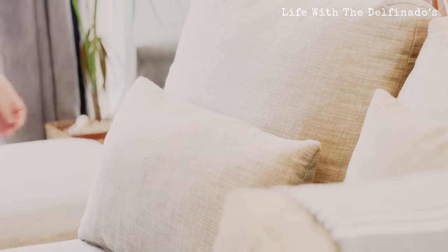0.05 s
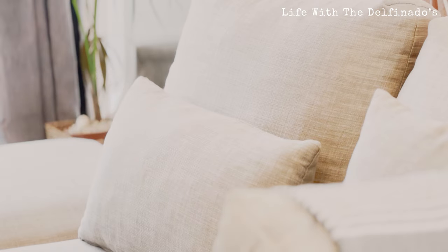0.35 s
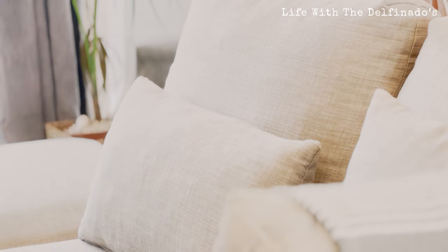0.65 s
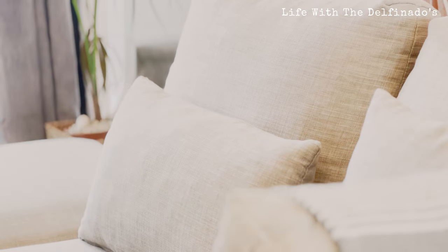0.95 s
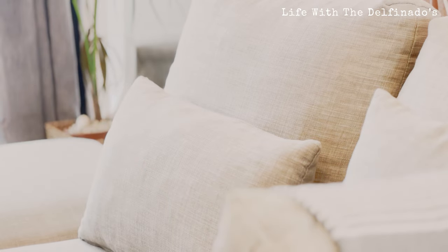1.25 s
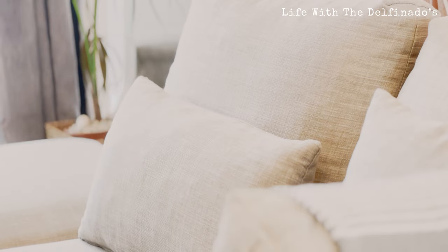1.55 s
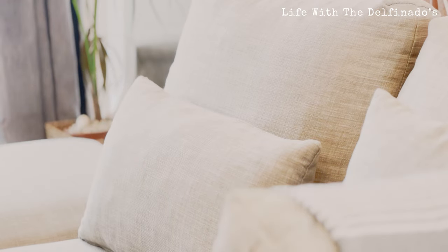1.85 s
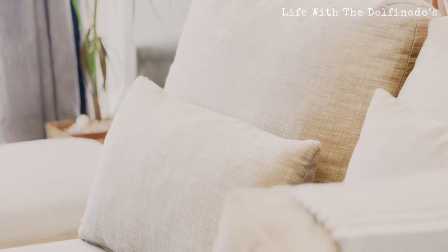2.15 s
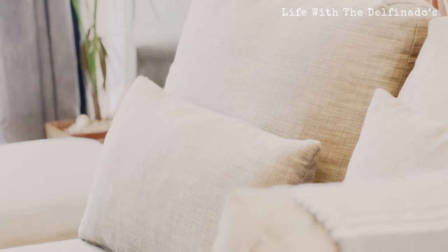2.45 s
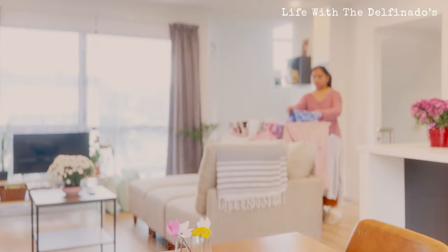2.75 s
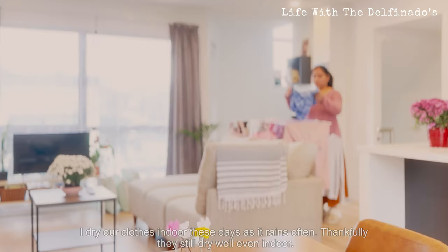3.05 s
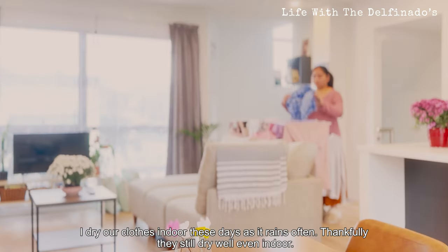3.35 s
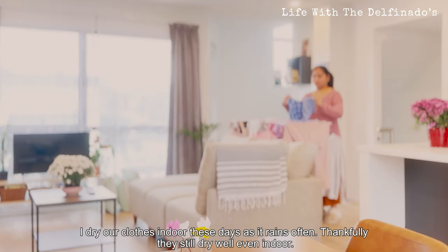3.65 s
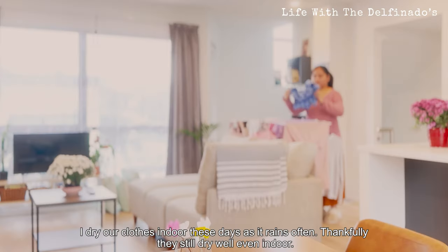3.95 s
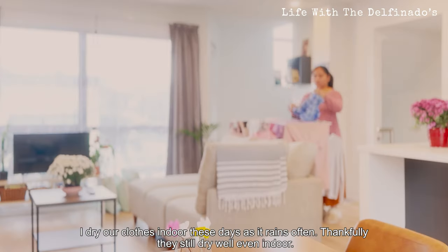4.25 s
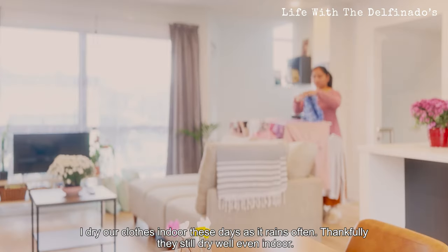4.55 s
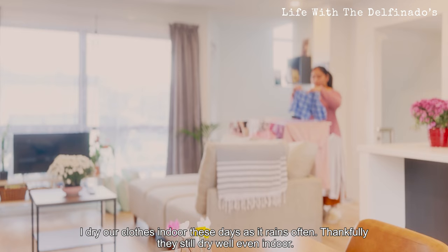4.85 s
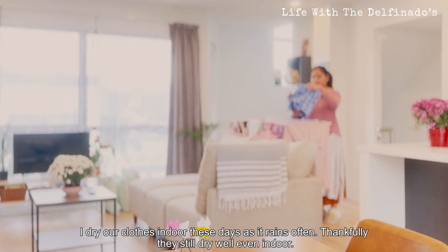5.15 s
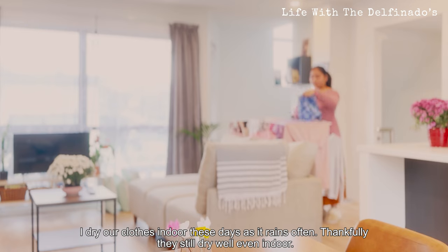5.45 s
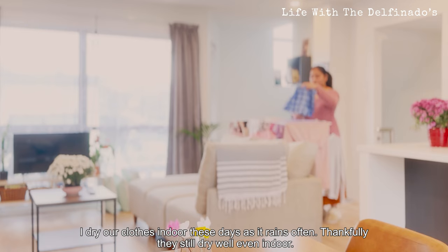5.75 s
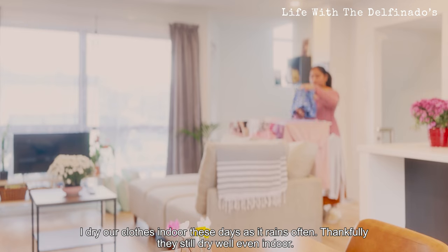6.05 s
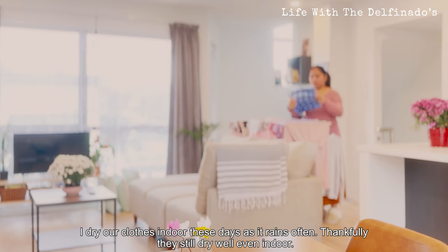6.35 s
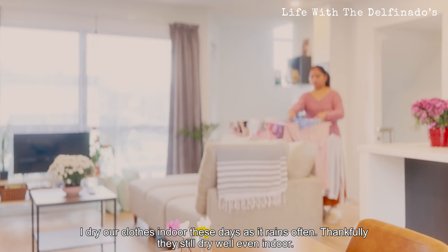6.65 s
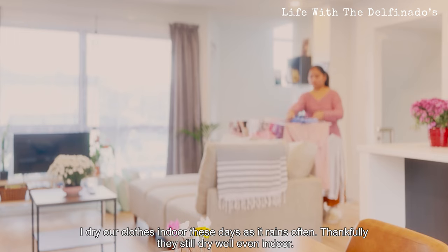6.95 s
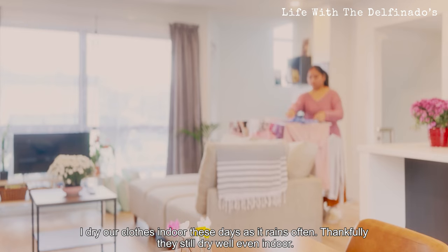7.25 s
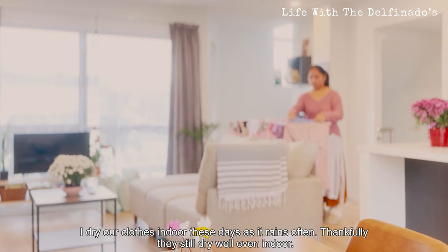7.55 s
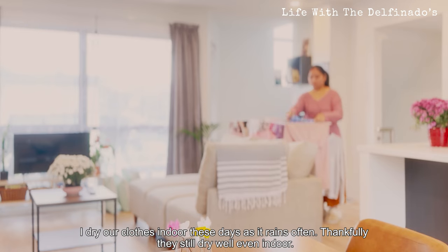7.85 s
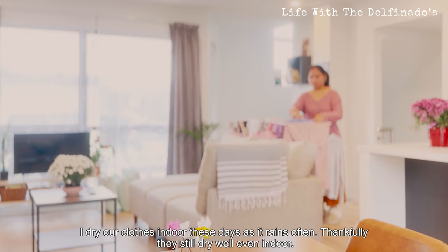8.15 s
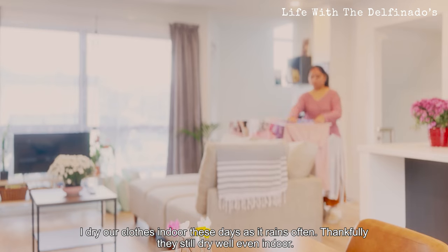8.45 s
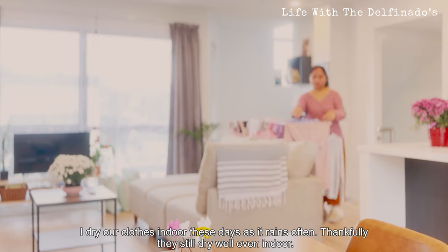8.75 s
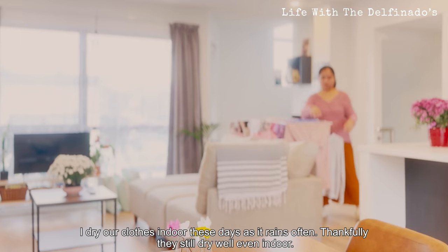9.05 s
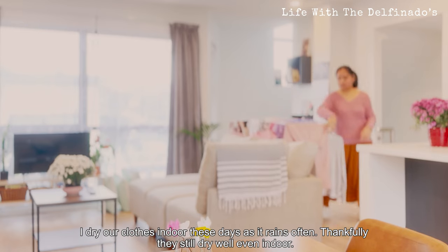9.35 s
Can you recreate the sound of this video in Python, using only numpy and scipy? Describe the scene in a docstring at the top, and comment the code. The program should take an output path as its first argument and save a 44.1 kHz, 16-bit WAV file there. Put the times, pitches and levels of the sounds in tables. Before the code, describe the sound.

Close clicks and knocks of tidying with soft cushion thumps, then a low hum and hangers knocking on a drying rack.

```python
"""Tidying a live living room.

Cushions are brushed and patted; light things are slid and set down with clicks and knocks.
Later, further off, laundry swishes and hangers knock on a drying rack while a deep drone swells and fades.
Furniture thumps softly and cloth rustles; room air, a faint hum and microphone hiss lie under it all."""
import sys
import numpy as np
from scipy import signal
from scipy.fft import rfft, irfft
from scipy.io import wavfile

SR = 44100
rng = np.random.default_rng(int(sys.argv[2]) if len(sys.argv) > 2 else 0)


def wrap_up_sound(samples):
    """Save the sound to the file named by the first command line argument, as 16-bit audio."""
    columns = np.atleast_2d(samples).T
    # keep every value between -1 and 1, then stretch to whole-number steps
    tamed = np.clip(columns, -1, 1)
    steps = np.round(tamed * 32767).astype(np.int16)
    wavfile.write(sys.argv[1], SR, steps)


N = 423360
RING = 2 ** 15  # samples per ring-out
TIME_S, RING_S = np.arange(N) / SR, np.arange(RING) / SR


def undb(db):
    """Decibels to gain."""
    return 10 ** (np.asarray(db) / 20)


def unit(x):
    """Scale to rms 1."""
    return x / np.sqrt(np.mean(x ** 2))


def curve(rows):
    """Interpolate (time [s], value) rows per sample."""
    return np.interp(TIME_S, *np.transpose(rows))


def along(points, hz):
    """Interpolate (frequency [Hz], value) rows on a log axis."""
    f, value = np.transpose(points)
    return np.interp(np.log(np.maximum(hz, 1)), np.log(f), value)


def colour(x, points):
    """Minimum-phase filter from (frequency [Hz], gain [dB]) rows."""
    n = x.shape[-1]
    cepstrum = irfft(np.log(undb(along(points, np.fft.rfftfreq(n, 1 / SR)))), n)
    cepstrum[1:n // 2] *= 2
    cepstrum[n // 2 + 1:] = 0
    return irfft(rfft(x) * np.exp(rfft(cepstrum)), n)


def wander(rate_hz):
    """Slow random drift, rms 1."""
    return unit(colour(rng.standard_normal(N), [(rate_hz, 0), (10 * rate_hz, -100)]))


def add(out, s, x):
    """Mix x into out from time s."""
    i = max(int(s * SR), 0)
    n = max(min(x.shape[-1], N - i), 0)
    out[..., i:i + n] += x[..., :n]


def air(spectrum, db, sway_db=1.0, sway_hz=4, sway_below_hz=500):
    """Mid/side noise: the low end sways, the hiss stays even."""
    noise = unit(colour(rng.standard_normal((2, N)), spectrum))
    low = signal.sosfiltfilt(signal.butter(2, sway_below_hz, fs=SR, output="sos"), noise)
    return undb(db) * (noise + low * (undb(sway_db * wander(sway_hz)) - 1))


# Air and hiss spectra: (frequency [Hz], relative density [dB])
NEAR_AIR = [(40, -20.5), (120, 1.5), (413, -4), (800, -8), (1070, -18.5), (1880, -21), (2940, -30),
            (5660, -33), (6580, -37), (8230, -36.5), (10200, -42), (12000, -36), (13000, -71)]
FAR_AIR = [(40, -35), (120, 0.5), (340, -8), (470, -12), (600, -20.5), (800, -16.5), (940, -25.5),
           (1620, -32.5), (2890, -30.5), (4700, -37), (7360, -31.5), (10000, -42), (11900, -37.5),
           (12800, -82.5)]


def room_air():
    """Room air with microphone hiss: a near and a far bed."""
    return air(NEAR_AIR, db=-49.5), air(FAR_AIR, db=-50)


# Rumble spectrum: (frequency [Hz], relative density [dB])
RUMBLE_SPECTRUM = [(15, -30), (30, 2.5), (40, 0), (58, 12), (80, 5), (100, -2.5), (140, -21), (250, -31),
                   (1000, -85.5)]
# Rumble envelope: (time [s], level [dB])
RUMBLE_LEVEL = [(0, -52.5), (0.8, -50), (2.7, -40.5), (3.6, -41), (5.4, -41.5), (7, -44), (7.6, -41),
                (8.3, -43), (9.1, -43), (9.6, -45.5)]


def rumble():
    """Low, slowly swelling room noise, mid/side."""
    return air(RUMBLE_SPECTRUM, curve(RUMBLE_LEVEL))


# Appliance tones: (frequency [Hz], level [dB])
HUM_TONES = [(111, -75), (334, -65.5), (819, -70.5), (8050, -89), (8290, -80.5)]


def hum(drift_rad=0.8, flutter_db=2):
    """An appliance hums and whines, wandering in phase and level; mid/side."""
    out = np.zeros((2, N))
    for hz, db in HUM_TONES:
        phase = 2 * np.pi * (hz * TIME_S + rng.random((2, 1))) + drift_rad * wander(2.7)
        out += np.sqrt(2) * undb(db + flutter_db * wander(2.5)) * np.sin(phase)
    return out


# Drone pitch: (time [s], frequency [Hz])
DRONE_PITCH = [(2.8, 53.2), (3.38, 53.1), (3.47, 54.5), (4.4, 54.6), (4.51, 55.9), (6.97, 55.8),
               (7.2, 60.0)]
# Drone envelope: (time [s], relative level [dB])
DRONE_LEVEL = [(2.7, -55), (2.78, -30.5), (2.94, -31.5), (3.07, -42.5), (3.19, -27), (3.37, -37.5),
               (3.49, -27), (3.61, -35), (3.95, -35), (4.21, -24.5), (4.33, -28.5), (4.45, -28),
               (4.65, -29.5), (5.13, -25), (5.29, -30), (5.35, -20.5), (5.58, -32.5), (5.69, -37),
               (5.81, -28.5), (5.93, -37), (6.0, -26), (6.27, -31), (6.34, -24.5), (6.82, -32.5),
               (7.0, -25.5), (7.3, -45)]


def drone(gain_db=-1.22, waver_db=0.3, waver_hz=6, octave_db=-25, fade_s=0.047):
    """A deep wavering tone with a faint octave, like an engine idling beyond the walls."""
    start_s, end_s = DRONE_LEVEL[0][0], DRONE_LEVEL[-1][0]
    gate = np.clip(np.minimum(TIME_S - start_s, end_s - TIME_S) / fade_s, 0, 1)
    level = undb(curve(DRONE_LEVEL) + gain_db + waver_db * wander(waver_hz))
    phase = 2 * np.pi * np.cumsum(curve(DRONE_PITCH)) / SR
    return gate * level * np.sqrt(2) * (np.sin(phase) + undb(octave_db) * np.sin(2 * phase))


# Rustle spectrum: (frequency [Hz], relative density [dB])
CLOTH_SPECTRUM = [(200, -18), (1200, 4.5), (2800, 3.5), (5000, -1), (8000, -2.5), (10500, -3.5),
                  (14000, -36)]
# Shaking and folding strokes: (peak time [s], level [dB])
CLOTH_STROKES = [(4.26, -70), (4.73, -66), (4.94, -66.5), (5.6, -75), (7.32, -68), (7.63, -66.5)]


def cloth(crinkle_db=3, resting_db=-81, half_stroke_s=0.064):
    """Fabric brushes over itself: a hiss that catches and lets go; mid/side."""
    grains = rng.standard_normal((2, N)) * undb(crinkle_db * np.tanh(wander(25)))
    strokes = sum(undb(db) * np.exp(-((TIME_S - s) / half_stroke_s) ** 2) for s, db in CLOTH_STROKES)
    return unit(colour(grains, CLOTH_SPECTRUM)) * (undb(resting_db) + strokes)


# Heavy-fold spectrum: (frequency [Hz], relative density [dB])
FOLD_SPECTRUM = [(90, -21), (200, 5.5), (380, 1), (800, -10.5), (1400, -28.5), (4000, -48)]
# Pushes on hanging laundry: (peak time [s], half length [s], level [dB])
LAUNDRY_PUSHES = [(3.85, 0.27, -64), (4.2, .12, -62), (5.46, .07, -55), (5.67, 0.14, -51),
                  (6.634, 0.035, -53), (7.28, 0.075, -55.5), (8.785, .04, -49.5)]


def folds(flap_db=4):
    """Heavy folds shift in dull, uneven swells; mid/side."""
    motion = sum(undb(db) * np.exp(-((TIME_S - s) / half_s) ** 2) for s, half_s, db in LAUNDRY_PUSHES)
    noise = unit(colour(rng.standard_normal((2, N)), FOLD_SPECTRUM))
    return noise * motion * undb(flap_db * np.tanh(wander(16)))


# Furniture and floor modes: (frequency [Hz], gain [dB], t60 [s])
FURNITURE_MODES = [(36.8, -17.5, 0.52), (49.6, 0, 0.59), (108.8, -9, 0.68), (176.7, -3.5, 0.36),
                   (218.4, -14, 0.37)]
# Soft blows: (time [s], relative level [dB], tilt [dB/octave])
THUMPS = [(0.87, -33.5, -3.5), (1.368, -31.5, 5.5), (1.573, -30.5, -0.5), (1.751, -33, 1), (2.02, -40, 5),
          (2.21, -38.5, 5), (2.419, -33, -5), (2.577, -35, 11.5), (2.71, -35.5, 7), (5.331, -51, -18),
          (6.61, -43, 2), (7.779, -49, -16)]


def thumps(push_cycles=0.85, pivot_hz=100):
    """Soft pushes ring furniture and floor; firmer ones favour the upper modes."""
    out = np.zeros(N)
    for s, db, tilt_db in THUMPS:
        for hz, mode_db, t60_s in FURNITURE_MODES:
            decay = undb(db + mode_db + tilt_db * np.log2(hz / pivot_hz) - 60 * RING_S / t60_s)
            attack = 1 - np.exp(-RING_S * hz / push_cycles)
            add(out, s, decay * attack * np.sin(2 * np.pi * hz * RING_S))
    return out


# Reverberation: (frequency [Hz], t60 [s])
ROOM_T60 = [(150, 1), (400, 0.41), (1000, 0.49), (2700, 0.45), (6500, 0.36), (14000, 0.18)]


def room_tail(build_s=0.0065, early_db=3, early_s=0.01):
    """Diffuse mid/side echoes: the nearest walls answer loudest, the treble dies first."""
    hz, s, noise = signal.stft(rng.standard_normal((2, RING)), SR, nperseg=256)
    decay = undb(-60 * s / along(ROOM_T60, hz)[:, None])
    tail = signal.istft(noise * decay, SR)[1][:, :RING]
    return tail * (1 - np.exp(-RING_S / build_s)) * undb(early_db * np.exp(-RING_S / early_s))


# Catching surfaces: (time [s], half length [s], pitch [Hz], glide [octave/s], level [dB])
SQUEAKS = [(0.533, .008, 1760, 6.5, -49), (2.197, .007, 6420, 3, -40), (2.202, 0.006, 2330, 10, -31),
           (2.212, 0.0083, 2710, 5.5, -34), (4.78, 0.021, 2820, -0.5, -67)]


def squeaks(unsteady_rad=0.67, room_db=-2):
    """Stick-slip: short tones glide with the speed of the rub and linger in the room; mid/side."""
    direct = np.zeros(N)
    waver = unsteady_rad * wander(40)
    for s, half_s, hz, octaves_per_s, db in SQUEAKS:
        span = np.abs(TIME_S - s) < 3 * half_s
        t = TIME_S[span] - s
        cycles = np.cumsum(hz * 2 ** (octaves_per_s * t)) / SR
        direct[span] += undb(db) * np.exp(-(t / half_s) ** 2) * np.sin(2 * np.pi * cycles + waver[span])
    tail = room_tail()
    tail /= np.sqrt(np.sum(tail[0] ** 2))
    out = undb(room_db) * signal.fftconvolve(direct[None], tail, axes=1)[:, :N]
    out[0] += direct
    return out


# Edge snaps: (time [s], peak [dB], width [s])
SNAPS = [(0.8384, -31, .0009), (0.8418, -31, .0013), (0.85, -34, 0.0008), (0.85, -12.5, 0.00035),
         (2.642, -36, 0.00028)]


def snaps(ring_hz=5830):
    """A thin hard edge flicks past: a few bright cycles, centred."""
    out = np.zeros(N)
    for s, db, width_s in SNAPS:
        span = np.abs(TIME_S - s) < 10 * width_s
        t = TIME_S[span] - s
        out[span] += undb(db) * np.exp(-np.abs(t) / width_s) * np.sin(2 * np.pi * ring_hz * t)
    return out


# Hard first touches on the table top: (time [s], level [dB], length [s])
CRACKS = [(0.8505, -24, 0.0043), (2.0157, -34, 0.009), (2.5747, -29, 0.0031), (2.703, -27.5, 0.0068)]


def cracks(start_hz=2734, fall_s=0.00462, rise_s=0.00041):
    """Bending waves in a board: highs arrive first, so the pitch falls; mid only."""
    out = np.zeros((2, N))
    cycles = start_hz * RING_S / (1 + RING_S / fall_s)
    chirp = (1 - np.exp(-RING_S / rise_s)) * np.sin(2 * np.pi * cycles)
    for s, db, length_s in CRACKS:
        add(out[0], s, undb(db) * np.exp(-(RING_S / length_s) ** 2) * chirp)
    return out


# Modes of the handled things: (frequency [Hz], gain [dB], t60 [s])
WOOD_MODES = [(319.6, 3.5, 0.21), (678, 8, 0.12), (734, 3, 0.28), (1230, -19, 0.4), (1490, -6, .28),
              (1676, -0.5, 0.26), (1810, 6, 0.16), (2500, -6, 0.18), (3270, -4, 0.3), (3510, 2, .16),
              (4200, -1, 0.2), (4780, -5, .28), (6330, 9, .2), (7000, 8, .12)]
TUB_MODES = [(440, 1, 0.52), (768, 7, 0.44), (1138, 2.7, 0.69), (1260, 4.1, .25), (1440, 11, 0.057),
             (1712, 6.6, 0.29), (1800, 5, 0.64), (2040, 5.3, .08)]
TABLE_MODES = [(233, 3.5, 0.35), (500, 5, 0.11), (1280, -8, .18), (1610, -5, 0.34), (1780, -6, 0.046),
               (1910, 4, 0.2), (1970, 3, .2), (2250, 4, 0.16), (2330, 0, .08), (3450, 13, 0.18),
               (6760, 2, .12)]
PLASTIC_MODES = [(1120, 3, .2), (1535, 5, 0.33), (1600, -4, 0.2), (1880, 8.5, 0.3), (2140, -1, .2),
                 (2500, 11, .14), (2670, 12, 0.17), (2920, 5, 0.16), (3100, -4, 0.14), (3470, 4, .16),
                 (6700, 13, .06), (7010, -8, 0.07)]
HANGER_MODES = [(595, -7.5, 0.1), (1215, -2.5, 0.3), (1560, 1.5, 0.21), (1981, -3.5, 0.4),
                (2160, 3.5, 0.13), (4040, -6, .12), (5050, -15, .2), (5100, 10, 0.14), (6950, -14, .12),
                (6900, 7.5, 0.17)]
MODES_OF = {"wood": WOOD_MODES, "tub": TUB_MODES, "table": TABLE_MODES,
            "plastic": PLASTIC_MODES, "hanger": HANGER_MODES}


def contact_response(thing, direct_db, ring_db, burst_s=0.0039):
    """One contact, mid/side: a dry burst, the thing's modes and the room."""
    t = RING_S[:RING // 4]
    body = 2 * undb(direct_db) * rng.standard_normal((2, len(t))) * np.exp(-t / burst_s)
    for hz, db, t60_s in MODES_OF[thing]:
        # each contact point favours other modes
        detune, strength, *phase = rng.standard_normal(4)
        cycles = hz * (1 + .002 * detune) * t + np.c_[phase]
        body += undb(ring_db + db + 2 * strength - 60 * t / t60_s) * np.sin(2 * np.pi * cycles)
    return room_tail() + np.pad(body, [(0, 0), (0, RING - len(t))])


# Borders of the four tone_db bands: body, mid, presence, treble
BAND_EDGES_HZ = np.array([130, 500, 1400, 4000, 10000])


def contact_spectrum(tone_db, db, tilt_db, knee_hz, edge_db=-5, top_db=-11, soft_loss_octaves=2.7):
    """Hard contacts tilt up above the knee; soft ones push longer and lose extra treble."""
    centres_hz = np.sqrt(BAND_EDGES_HZ[1:] * BAND_EDGES_HZ[:-1])
    octaves = np.log2(np.maximum(centres_hz / knee_hz, 1))
    band_db = db + np.asarray(tone_db) + tilt_db * (octaves - octaves.mean())
    band_db[-1] += soft_loss_octaves * min(tilt_db, 0)
    density_db = band_db - 10 * np.log10(np.diff(BAND_EDGES_HZ) / (SR / 2))
    low_end = [(50, density_db[0] - 14), (160, density_db[0])]
    high_end = [(9300, density_db[-1] + edge_db), (11500, density_db[-1] + top_db)]
    return [*low_end, *zip(centres_hz, density_db), *high_end]


def slides(rows, tone_db, ring_db, gain_db, slips_per_s=1100, spread_db=4, direct_db=6, grip_s=0.0022):
    """Friction: tiny uneven slips, each ringing the thing and the room; mid/side."""
    out = np.zeros((2, N))
    for start_s, end_s, db, tilt_db, swell_db, thing in rows:
        n = int(np.clip((end_s - start_s) * SR, SR / 100, RING / 2))
        slipping = rng.random(RING)[:n] < slips_per_s / SR
        size = rng.standard_normal(RING)[:n]
        slips = unit(slipping * np.sign(size) * undb(spread_db * np.abs(size)))
        grip = 1 - np.exp(-RING_S[:n] / grip_s)
        slips *= grip * undb(np.linspace(-swell_db, 0, n))
        response = contact_response(thing, direct_db, ring_db)
        response /= np.sqrt(np.sum(response[0] ** 2))
        rub = signal.fftconvolve(response, slips[None], axes=1)[:, :RING]
        spectrum = contact_spectrum(tone_db, db, tilt_db, knee_hz=255, edge_db=-3, top_db=-6.5)
        add(out, start_s, colour(rub, spectrum))
    return out * undb(gain_db)


def knocks(rows, tone_db, knee_hz, ring_db, gain_db, hollow_db, hollow_q, attack_s=0.017):
    """Single blows, lifted at the hollow resonance of the thing struck; mid/side."""
    out = np.zeros((2, N))
    for s, db, tilt_db, direct_db, hollow_hz, pan_db, thing in rows:
        blow = contact_response(thing, direct_db, ring_db)
        blow /= np.sqrt(np.mean(blow[:, :int(attack_s * SR)] ** 2))
        blow += (undb(hollow_db) - 1) * signal.lfilter(*signal.iirpeak(hollow_hz, hollow_q, SR), blow)
        # off centre, part of the mid enters the side
        blow[1] += blow[0] * (undb(pan_db) - 1) / (undb(pan_db) + 1)
        add(out, s, colour(blow, contact_spectrum(tone_db, db, tilt_db, knee_hz)))
    return out * undb(gain_db)


# Hanger blows: (time [s], relative level [dB], tilt [dB/octave], direct gain [dB],
# hollow resonance [Hz], leftward pan [dB], thing)
HANGER_KNOCKS = [(6.411, -55, 8, -1.5, 2860, 3, "hanger"), (6.534, -56, -1, -5, 2300, -2, "hanger"),
                 (6.569, -54, 7, -8, 1040, 8, "hanger"), (6.586, -57, -10, 11, 850, -3, "hanger"),
                 (6.622, -49, -1, 7.5, 2100, 0, "hanger"), (6.631, -55.5, -1, 4, 865, 5, "hanger"),
                 (8.732, -46, 2, 5, 5160, 13, "hanger"), (8.738, -38, 6, 1, 1690, 2, "hanger"),
                 (8.759, -41, -4, 6.5, 570, -4, "hanger"), (8.776, -50.5, -11, 4, 586, 3, "hanger"),
                 (8.814, -46.5, -5, 17, 593, 6, "hanger"), (9.038, -64.5, -3, 7, 400, 0, "hanger"),
                 (9.188, -58, -2, 6, 1530, 0, "hanger"), (9.267, -44.5, 1.5, -5, 2900, 1, "hanger")]
# Laundry drags: (start [s], end [s], relative level [dB], tilt [dB/octave], swell [dB], thing)
RACK_SLIDES = [(6.55, 6.63, -52.5, -1.5, -4, "hanger"), (8.625, 8.71, -52.5, 2, 9, "hanger"),
               (8.70, 8.742, -38, 2.5, 16, "hanger"), (9.03, 9.19, -60.5, -1, 1, "hanger"),
               (9.20, 9.265, -48.5, 0.5, 9.5, "hanger"), (9.267, 9.31, -42, 1, 2.5, "hanger"),
               (9.31, 9.39, -52, 1.9, -6.5, "hanger"), (9.54, 9.60, -63.5, 4.5, 4, "hanger")]


def drying_rack():
    """Light hangers knock on the rack and laundry drags over it."""
    blows = knocks(HANGER_KNOCKS, tone_db=(-1.6, 1, -2.1, 0.48), knee_hz=2300,
                   ring_db=-15.5, gain_db=-3, hollow_db=11, hollow_q=3.1)
    return blows + slides(RACK_SLIDES, tone_db=(5, 0.5, 0, -2.5), ring_db=-37, gain_db=-2)


# Pats and set-downs: (time [s], relative level [dB], tilt [dB/octave], direct gain [dB],
# hollow resonance [Hz], leftward pan [dB], thing)
ITEM_KNOCKS = [(0.389, -56, -3.5, -1, 393, -5, "wood"), (0.456, -61, -1.5, 6, 400, -2, "wood"),
               (0.527, -63, -3, -5, 1760, -12, "wood"), (0.851, -42, 0.5, 3, 680, 0, "wood"),
               (0.857, -41, 0.6, 0.5, 1660, -8, "wood"), (1.149, -56, 2.5, -5, 810, 0, "tub"),
               (1.159, -57, -2, -14, 705, -4, "tub"), (1.174, -52, -0.5, -2.5, 1130, -8, "tub"),
               (1.311, -64.5, 2.5, 4, 5900, -5, "wood"), (1.367, -45.5, 0.5, 1.5, 410, -1, "wood"),
               (1.468, -49, -1, 2, 2630, -5, "wood"), (1.525, -61, -4.5, 5.5, 910, 0, "wood"),
               (1.556, -56.5, -3, 3.5, 1990, -6, "wood"), (1.677, -49.5, 1.5, 1, 4250, -3, "wood"),
               (1.690, -53, -1, 5.5, 2880, -2, "wood"), (2.018, -37.5, -0.3, -0.5, 640, -2, "table"),
               (2.029, -41.5, 0.5, 1.5, 520, -3, "table"), (2.199, -40.5, 0.5, -5, 1970, -7, "plastic"),
               (2.212, -44, -1.4, -1.5, 2950, 1, "plastic"), (2.577, -42, -1.2, 0.5, 2100, -5, "table"),
               (2.643, -53.5, 3.5, 1, 5400, -3, "table"), (2.706, -46, -1.5, 1, 1740, -10, "table"),
               (3.242, -51, -0.4, 13, 1830, -4, "table")]
# Brushes and pushes: (start [s], end [s], relative level [dB], tilt [dB/octave], swell [dB], thing)
ITEM_SLIDES = [(0.47, 0.56, -62.5, -3.8, -2.5, "wood"), (0.806, 0.850, -47.5, 5.5, 33, "wood"),
               (1.15, 1.20, -68, -6, 13, "tub"), (1.32, 1.36, -64.5, -1, -8, "wood"),
               (1.375, 1.47, -58.5, 4.5, 2.5, "wood"), (1.50, 1.66, -67, -2.5, -9.5, "wood"),
               (1.648, 1.688, -50.5, 1.5, 12.5, "wood"), (1.70, 1.79, -53.5, -3.5, 13, "wood"),
               (2.152, 2.216, -43.5, 6, 25, "plastic"), (2.605, 2.665, -53, 0, 2, "table"),
               (2.83, 2.88, -54.5, -0.5, 12, "wood"), (2.94, 3.12, -70, 0, 2.5, "wood")]


def handled_items():
    """Nearby cushions and light things are patted, brushed, slid and set down."""
    blows = knocks(ITEM_KNOCKS, tone_db=(2, 6.5, 0.5, -8.5), knee_hz=255,
                   ring_db=-23.5, gain_db=1.5, hollow_db=7.5, hollow_q=7)
    return blows + slides(ITEM_SLIDES, tone_db=(5, 6.5, 7, -1.5), ring_db=-19, gain_db=1.5)


# Mid response; the two microphone ports cancel near 11 kHz: (frequency [Hz], gain [dB])
PORT_DIP = [(9800, -0.5), (10500, -12), (11300, -39.5), (12000, -21.5), (12700, -1.5)]


def pick_up(sound, width):
    """Mid/side to left/right; the bass is nearly alike in both."""
    mid, side = sound
    return colour(mid, PORT_DIP) + np.array([[1], [-1]]) * colour(side, width)


# Stereo width of each pick-up: (frequency [Hz], side gain [dB])
NARROW_WIDTH = [(60, -27.5), (200, -11.5), (380, -10), (700, -4.5), (1400, 1.5), (2400, -9.5), (4400, -10),
                (6200, -17.5), (7500, 9), (8600, -17), (11000, 8.5), (14000, -18)]
WIDE_WIDTH = [(60, -16), (110, -10), (200, -9), (380, -8.5), (700, 2), (1300, -0.5), (2400, -0.5),
              (7000, -1), (9000, -6), (11000, 8.5), (14000, -18)]
# Uneven response of the narrow pick-up, notched in the treble: (frequency [Hz], gain [dB])
NARROW_RESPONSE = [(200, 0.5), (270, -4), (360, -1), (1000, -8), (3300, -0.5), (4500, -1.5), (6000, 3.5),
                   (7100, 6), (7500, -8), (7950, 7.5), (9000, 2.5)]


def scene(widen_start_s=2.7, widen_end_s=3.35):
    """Close handling in a narrow image, then the rack in a wide one."""
    widen = curve([(widen_start_s, 0), (widen_end_s, 1)])
    items = handled_items() + cracks() + squeaks()
    rack = drying_rack()
    near_air, far_air = room_air()
    near = colour(items + np.sqrt(1 - widen) * near_air, NARROW_RESPONSE)
    far = rack + np.sqrt(widen) * (far_air + hum() + cloth() + folds()) + rumble()
    bass = (drone() + thumps()) * undb([[-.35], [.35]])  # slightly right
    return pick_up(near, NARROW_WIDTH) + pick_up(far, WIDE_WIDTH) + bass + snaps()


def record(dry):
    """Steep low-pass at 15.2 kHz."""
    return signal.sosfilt(signal.ellip(8, .2, 70, 15200, fs=SR, output="sos"), dry)


dry = scene()
out = record(dry)
wrap_up_sound(out)
```